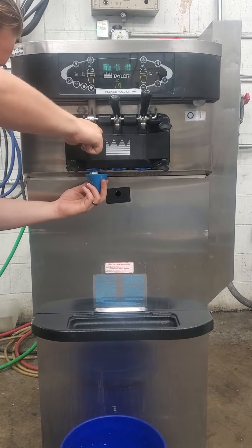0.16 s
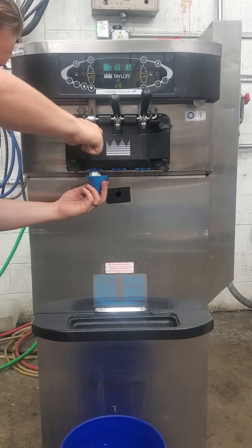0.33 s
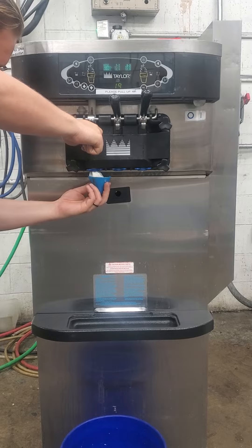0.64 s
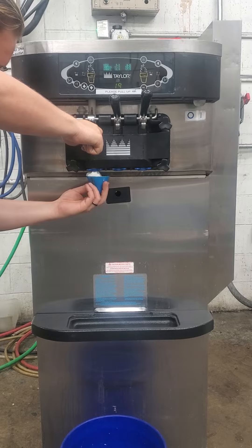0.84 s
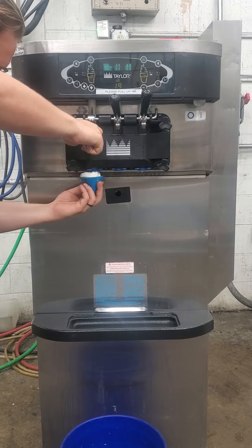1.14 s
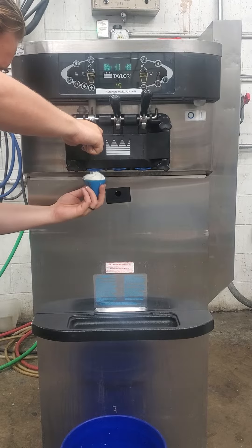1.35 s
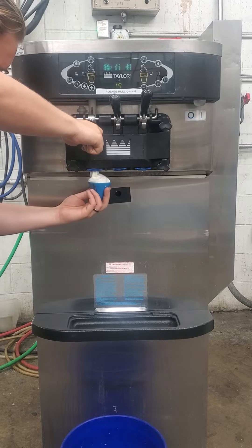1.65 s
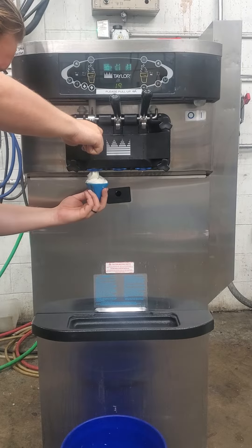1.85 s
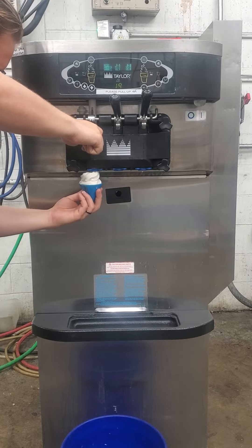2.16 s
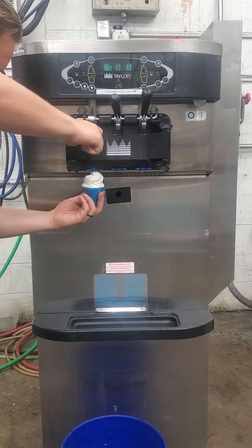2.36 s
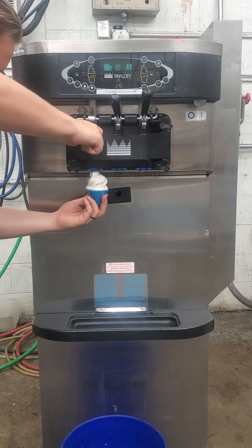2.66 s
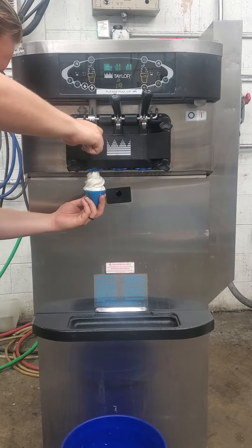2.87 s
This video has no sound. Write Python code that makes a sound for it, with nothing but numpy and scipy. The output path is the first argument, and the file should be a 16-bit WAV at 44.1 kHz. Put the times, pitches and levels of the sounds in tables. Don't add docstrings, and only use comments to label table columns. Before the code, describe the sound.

A soft-serve machine hums and whines steadily with rushing air, then a lever clicks and scrapes.

```python
import sys
import numpy as np
from scipy import signal
from scipy.fft import rfft, irfft
from scipy.io import wavfile
from scipy.ndimage import uniform_filter1d

SR = 44100
rng = np.random.default_rng(int(sys.argv[2]) if len(sys.argv) > 2 else 0)


def nominal_scale(level):
    x = np.asarray(level, float) / 20
    return 10 ** x


def inscribe(sig):
    pcm = np.round(np.clip(np.atleast_2d(sig).T, -1, 1) * 32767)
    wavfile.write(sys.argv[1], SR, pcm.astype(np.int16))


N = 132300

# f/Hz, correlation (-1 to 1)
ALIKE_AT_HZ = [(60, 0.96), (150, 0.93), (290, 0.94), (640, 0.47), (1200, -0.26), (3000, -0.14),
               (8000, -0.0064)]


def rms_one(x):
    return x / np.sqrt(np.mean(x ** 2) + 1e-20)


def at_hz(points, hz):
    table = np.array(points)
    return np.interp(np.log(hz), np.log(table[:, 0]), table[:, 1])


def drift(rate):
    r = np.exp(-80 * np.pi * rate / SR)
    slow = signal.lfilter([1], [1, -2 * r, r * r], rng.standard_normal(N // 40 + 2002))[2000:]
    return np.interp(np.arange(N) / 40, np.arange(len(slow)), rms_one(slow - slow.mean()))


def ring(clicks, hz, t60):
    r = nominal_scale(-60 / (t60 * SR))
    w = 2 * np.pi * min(hz, SR / 2.5) / SR
    return signal.lfilter([0, np.sin(w)], [1, -2 * r * np.cos(w), r * r], clicks)


def band(x, hz, width_hz):
    r = np.exp(-np.pi * width_hz / SR)
    poles = [1, -2 * r * np.cos(2 * np.pi * hz / SR), r * r]
    return signal.lfilter(np.array([1, 0, -1]) * (1 - r * r) / 2, poles, x)


def treble(x, low_hz):
    return signal.sosfilt(signal.butter(2, low_hz, "high", fs=SR, output="sos"), x)


def pan(difference_db):
    return nominal_scale(np.array([[.5], [-.5]]) * difference_db)


def diffuse(mid, side, hz):
    alike = np.clip(at_hz(ALIKE_AT_HZ, hz), -1, 1)
    return np.sqrt(1 + alike) * mid + np.sqrt(1 - alike) * side * [[1], [-1]]


def tones(rows, base_hz, loose=True, sway=0, swell_db=0):
    out = np.zeros((2, N))
    turn = 2 * np.pi * base_hz * np.arange(N) / SR + sway
    for k, db, pan_db, lead in rows:
        level_db = db + 0.45 * drift(4) + swell_db * (k > 30)
        free = loose or k % 4 > 0 or k > 48
        phase = k * turn + 0.1 * drift(2.8) + 2 * np.pi * rng.random() * free
        wave = np.sqrt(2) * nominal_scale(level_db) * np.exp(1j * phase)
        sides = rms_one(pan(pan_db)) * np.exp(.5j * lead * np.array([[1], [-1]]))
        out += np.imag(wave * sides * np.exp(-1j * np.angle(sides.sum())))
    return out


def motor():
    # multiple, level/dB rms, left-right/dB, left lead/rad
    orders = [(4, -32.6, -0.9, 0.0), (8, -52.2, -4.2, 0.1), (12, -46.3, -1.4, 0.1), (16, -56.4, -3.1, -0.3),
              (39, -57.7, 6.0, -2.9), (40, -46.3, 8.8, 2.1), (43, -54.4, 2.1, -2.1),
              (44, -35.2, -4.8, -1.7), (45, -48.6, 3.9, -1.6), (46, -51.6, 10.1, 0.9),
              (47, -58.5, -7.6, -1.8), (48, -42.9, 8.8, -0.6), (49, -52.4, 4.1, -1.4),
              (50, -55.9, -1.0, -0.4), (52, -51.6, -4.6, -1.0), (53, -58.5, 1.7, -0.8),
              (56, -60.6, 3.7, 2.9), (80, -57.8, -1.9, -1.9), (84, -60.7, -3.0, 2.8),
              (88, -53.0, -0.4, -1.9), (92, -53.6, 0.1, 2.1), (93, -60.0, 1.6, -0.2),
              (96, -63.0, -0.8, -0.2), (101, -61.6, 5.0, 2.3), (104, -59.2, 3.6, -2.4),
              (115, -58.8, 2.4, 1.5), (117, -61.7, -5.9, 1.1), (277, -74.6, 2.2, -1.4)]
    # t/s, level/dB
    whine = [
        (0, 0.5),
        (.4, 0),
        (1.1, 0.4),
        (1.6, -1.5),
        (1.9, -1),
        (2.15, 1),
        (2.4, 1),
        (2.7, -1),
        (3, -0.5),
    ]
    swell_db = np.interp(np.arange(N) / SR, *np.transpose(whine))
    return tones(orders, 30.011, loose=False, swell_db=swell_db)


def fan():
    # multiple, level/dB rms, left-right/dB, left lead/rad
    orders = [(1, -32.3, 0.8, 0.0), (2, -45.2, 2.2, 0.1), (3, -52.1, 1.9, -0.3), (4, -48.9, 5.6, 0.1),
              (6, -50.5, 5.9, -0.5), (7, -51.5, -10.0, -0.1), (8, -57.2, -2.6, -0.7)]
    sway_rad, sway_s = 0.3, 2.9
    sway = sway_rad * np.cos(2 * np.pi * np.arange(N) / SR / sway_s)
    return tones(orders, 72.27, sway=sway)


def room_tones():
    # f/Hz, level/dB rms, left-right/dB, left lead/rad
    steady = [(41.2, -57.4, -0.1, 0.1), (63.7, -44.2, -0.6, 0.0), (87.4, -45.6, -5.1, 0.6),
              (1417.0, -59, 0, 0), (3358.8, -60.9, 1.6, -0.9), (3896.2, -64.6, -1.6, -2.3),
              (4325.4, -63.6, -14.9, 1.0), (4486.5, -66.4, -4.1, 2.8), (4969.8, -64.2, 3.6, 2.2),
              (5573.1, -68.0, 0.9, -2.4), (12487.6, -66.8, 7.2, 3.0)]
    return tones(steady, 1)


def air(spectrum, low_hz, count, patchy_db):
    # f/Hz, level/dB
    lean = [(100, 1.5), (1000, 0.3), (4000, 1), (12000, 1.5)]
    out, together = 0, drift(3)
    edges = low_hz * 2 ** (np.arange(count + 1) / 3)
    white = rng.standard_normal((2, 2, N + 8192))
    for k, (low, high) in enumerate(zip(edges, edges[1:])):
        third = signal.butter(2, [low, high], "band", fs=SR, output="sos")
        mid, side = signal.sosfilt(third, white[k % 2])[:, -N:]
        hz = np.sqrt(low * high)
        level_db = at_hz(spectrum, hz) + patchy_db * (.5 * together + drift(8.5))
        out = out + nominal_scale(level_db) * pan(at_hz(lean, hz)) * diffuse(mid, side, hz)
    return rms_one(out)


def wind():
    # f/Hz, level/dB per Hz
    rumble = [(30, -26), (42, -20), (55, 0), (85, -10.5), (130, -4.5), (260, -9), (420, -8.5), (600, -14)]
    # f/Hz, level/dB per Hz
    rush = [(600, 1), (1500, -0.5), (2000, -4.5), (2800, -5), (4500, -13), (6500, -17.5), (10500, -19),
            (14000, -20)]
    flow = nominal_scale(-37.5) * air(rumble, 18.75, count=15, patchy_db=1.4)
    flow = flow + nominal_scale(-36.5) * air(rush, 600, count=15, patchy_db=.4)
    hollow_hz, hollow_width_hz, hollow_share = 1090, 135, 0.42
    return flow - hollow_share * band(flow, hollow_hz, hollow_width_hz)


def booms():
    # f/Hz, width/Hz, level/dB rms
    modes = [(66.3, 7.7, -68), (99.2, 23, -43.5), (150.5, 10, -45), (216.2, 12, -53), (352.3, 20.5, -48),
             (389, 21, -49), (452, 17, -52.5), (660, 74, -55.5), (1340, 210, -58)]
    out = 0
    for hz, width_hz, db in modes:
        noise = rng.standard_normal((2, N + 8192))
        mid, side = band(band(noise, hz, width_hz), hz, width_hz)[:, -N:]
        out = out + nominal_scale(db) * rms_one(diffuse(mid, side, hz))
    return out


def beater():
    # multiple, level/dB rms, left-right/dB, left lead/rad
    gear = [(216, -61.3, -3.9, -0.9), (231, -61.0, -0.2, 2.5), (243, -63.0, 3.1, -2.8),
            (263, -59.5, -5.6, -0.3), (267, -59.4, -0.2, -1.3), (276, -61.7, 3.6, 1.5),
            (299, -56.9, 9.9, 2.5), (324, -63.7, 0.4, 1.3), (326, -65.5, -7.0, -2.6),
            (333, -64.8, -0.8, -0.6), (344, -64.9, -10.4, 2.1), (366, -68.1, -0.5, 1.5),
            (371, -64.7, 6.5, -2.6), (375, -67.4, -3.8, 2.5), (392, -65.4, -14.2, 0.2),
            (398, -60.1, 2.6, -2.3), (416, -68.2, 0.8, -0.3), (434, -69.7, 4.7, 1.4)]
    # f/Hz, level/dB per Hz
    rattle = [(1200, -1), (2200, 7), (2600, -4.5), (3000, 3), (3400, -0.5), (4200, -5.5), (6500, -3),
              (8500, -9.5)]
    beater_hz, lump_db, spread_db = 12.1112, 4, 3
    size = 2 ** 14
    lumps = rms_one(uniform_filter1d(rng.standard_normal(size), size=600, mode="wrap"))
    turn = rfft(rng.standard_normal((2, size)) * nominal_scale(lump_db * lumps))
    hz = np.arange(1, size // 2 + 2) * beater_hz
    level_db = at_hz(rattle, hz) + spread_db * rng.standard_normal(len(hz))
    turn = irfft(turn * nominal_scale(level_db) * (hz > 1000) * (hz < 10000))
    place = np.arange(N) / SR * beater_hz * size % size
    loop = np.array([np.interp(place, np.arange(size), side) for side in turn])
    return nominal_scale(-46.5) * rms_one(loop) + tones(gear, beater_hz)


def chinks():
    # f/Hz, t60/s, level/dB rms
    panels = [(2274, 0.023, -56), (2595, 0.021, -47.5), (2790, 0.019, -58), (3284, 0.02, -54),
              (3563, 0.034, -57.5), (4114, 0.023, -54), (4776, .02, -60.5)]
    touches_per_s, spread_db = 70, 3
    out = 0
    for hz, t60, db in panels:
        force = nominal_scale(spread_db * np.minimum(rng.exponential(1, N), 3))
        touch = (rng.random(N) < touches_per_s / SR) * force * rng.choice([-1, 1], N)
        left = ring(touch + 1e-18, hz, t60)
        right = ring(np.roll(touch, 40) + 1e-18, hz * 1.01, t60)
        out = out + nominal_scale(db) * rms_one(band(np.array([left, right]), hz, 300))
    return out


def churn():
    # t/s, level/dB
    strength = [
        (0, -56),
        (.6, -57),
        (.8, -47),
        (1.0, -47),
        (1.25, -53),
        (1.6, -56),
        (1.9, -51),
        (2.2, -54),
        (3, -54),
    ]
    hz, width_hz, lump_db = 547, 280, 3.5
    mid, side = band(band(rng.standard_normal((2, N)), hz, width_hz), hz, width_hz)
    level_db = np.interp(np.arange(N) / SR, *np.transpose(strength)) + lump_db * drift(8.7)
    return nominal_scale(level_db) * rms_one(mid + .5 * side * [[1], [-1]])


def thuds():
    # t/s, peak level/dB, f/Hz
    slaps = [(0.041, -30, 353), (0.192, -25.5, 374), (0.38, -32, 378), (0.452, -27, 364), (0.742, -29, 450),
             (0.908, -24.5, 376), (1.051, -29, 388), (1.376, -29, 401), (1.492, -28, 520),
             (1.842, -23, 372), (2.102, -26, 380), (2.181, -24, 375), (2.33, -30, 328), (2.555, -29, 350)]
    t60_s, trim_db, puff_db, width_hz, rise_s = 0.059, -4.5, -3.5, 350, 0.0026
    out, span = np.zeros((2, N + SR)), np.arange(SR // 8) / SR
    for s, db, hz in slaps:
        puff = rms_one(band(rng.standard_normal((2, len(span))), hz, width_hz))
        puff = puff[0] + .5 * puff[1] * np.array([[1], [-1]])
        puff = puff * nominal_scale(puff_db - 30 * span / t60_s)
        body = band(ring((span == 0) * 1., hz, t60_s), hz, width_hz)
        i = int(s * SR)
        out[:, i:i + len(span)] += nominal_scale(db + trim_db) * (body + puff) * np.minimum(span / rise_s, 1)
    return out[:, :N]


def ticks():
    # t/s, peak level/dB, f/Hz, dull body level/dB
    slips = [(1.0271, -34, 12900, -12), (1.5296, -27, 9500, -14), (1.6700, -29.5, 11300, 2),
             (1.6788, -23, 15400, -3), (1.6792, -31, 11000, -8), (1.7823, -24, 12300, -12),
             (1.832, -31, 11500, -12), (1.8392, -27, 12600, -10), (1.8668, -24, 12600, -8),
             (1.8702, -26, 12800, -10), (1.9354, -44, 9330, -12), (2.058, -30, 11800, -12),
             (2.0645, -30, 11000, -5), (2.1068, -16.5, 14000, -14), (2.1228, -28, 14900, -12),
             (2.1745, -31, 13500, -8), (2.186, -27, 14000, -6), (2.3078, -27, 14500, -12),
             (2.3208, -23, 12500, -1), (2.3315, -30, 14500, -6)]
    t60_s, body_hz, trim_db = 0.0039, 6630, -5.5
    crack_db, crack_low_hz = 1, 3000
    tail_db, tail_t60_s, tail_low_hz = -10, 0.068, 4830
    out, span = np.zeros((2, N)), np.arange(SR // 4) / SR
    click = (span == 0) * 1.
    for s, db, hz, body_db in slips:
        tick = ring(click, hz, t60_s) + nominal_scale(body_db) * ring(click, body_hz, t60_s * 2.3)
        tick += nominal_scale(crack_db + body_db / 2) * treble(click, crack_low_hz)
        tail = treble(rng.standard_normal((2, len(span))), tail_low_hz)
        tail = tail * nominal_scale(tail_db - 60 * span / tail_t60_s) * (span > .004)
        i = int(s * SR)
        out[:, i:i + len(span)] += nominal_scale(db + trim_db) * (tick + tail)
    return out


def rubs():
    # t/s, length/s, bright level/dB rms, dull level/dB rms
    strokes = [
        (1.59, .03, -52, -41),
        (1.67, 0.033, -42.5, -48),
        (1.855, 0.072, -48, -41.5),
        (2.043, 0.025, -43, -36),
        (2.076, .015, -51, -38),
        (2.098, 0.055, -51, -41),
        (2.176, 0.051, -45, -42),
        (2.304, 0.042, -38.5, -37),
    ]
    edge_s = 0.013
    t = np.arange(N) / SR
    grain = rng.standard_normal((2, N)) * nominal_scale(4.5 * drift(140))
    bright = rms_one(treble(grain, 4830))
    dull = rms_one(band(grain, 2730, 2500))
    out = 0
    for start, length, bright_db, dull_db in strokes:
        rise = t - start
        fall = (start + length - t) / 3 + edge_s
        pressure = np.clip(np.minimum(rise, fall) / edge_s, 0, 1) ** 2
        out = out + pressure * (nominal_scale(bright_db) * bright + nominal_scale(dull_db) * dull)
    return out


def lever():
    return (ticks() + rubs()) * pan(2.5)


def scene():
    machine = motor() + fan() + room_tones()
    return machine + wind() + booms() + beater() + chinks() + churn() + thuds() + lever()


def low_pass(x):
    return signal.sosfilt(signal.butter(12, 16410, fs=SR, output="sos"), x)


def record(dry):
    dip_hz, dip_width_hz, dip_share = 7570, 5700, 0.61
    mic = dry - dip_share * band(band(dry, dip_hz, dip_width_hz), dip_hz, dip_width_hz)
    mic = signal.sosfilt(signal.ellip(14, .1, 55, 15720, fs=SR, output="sos"), mic)
    return low_pass(mic)


dry = scene()
out = record(dry)
inscribe(out)
```